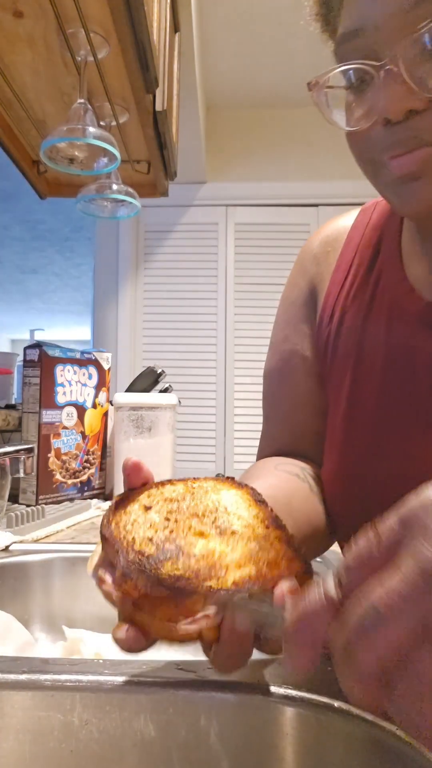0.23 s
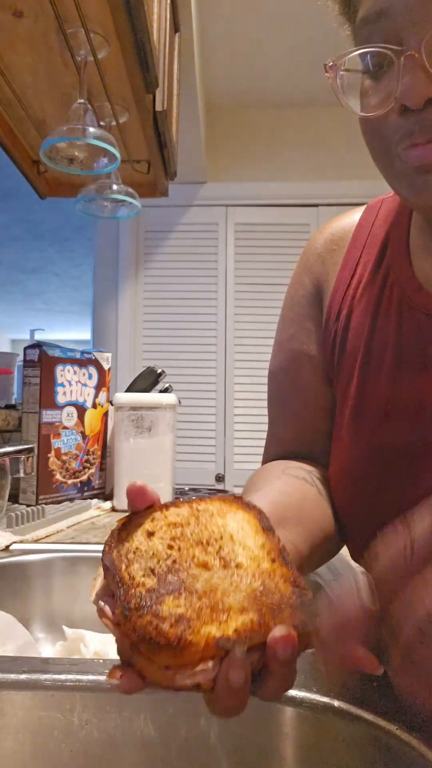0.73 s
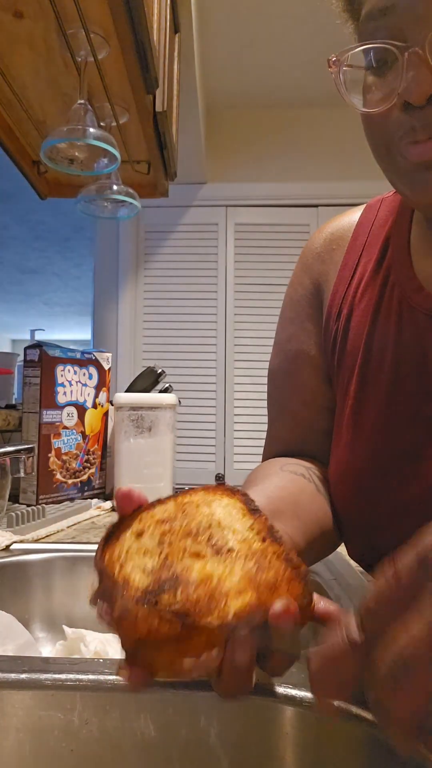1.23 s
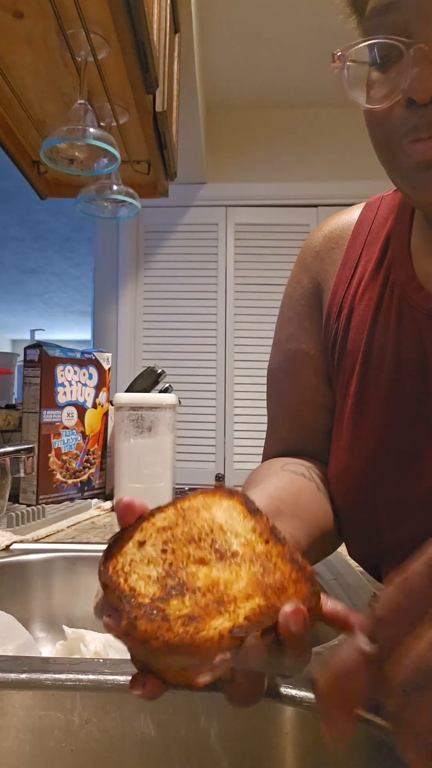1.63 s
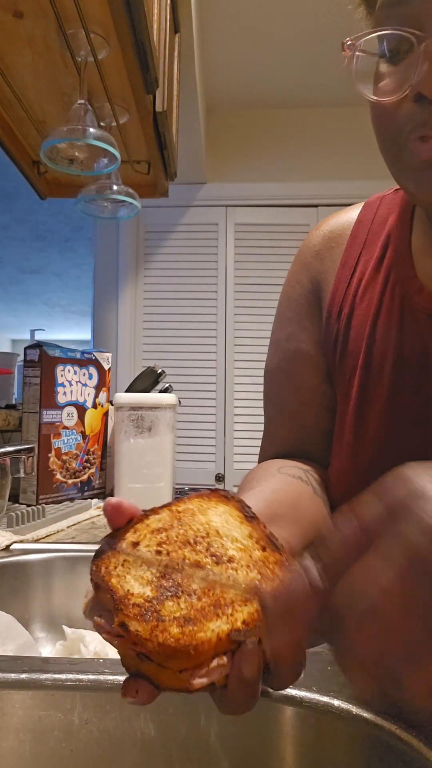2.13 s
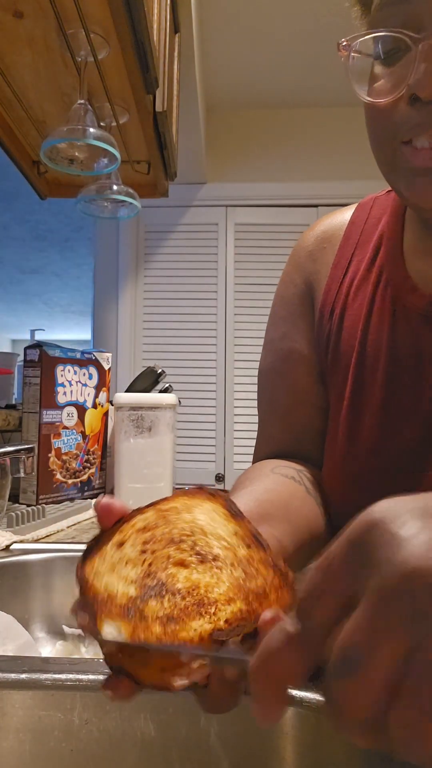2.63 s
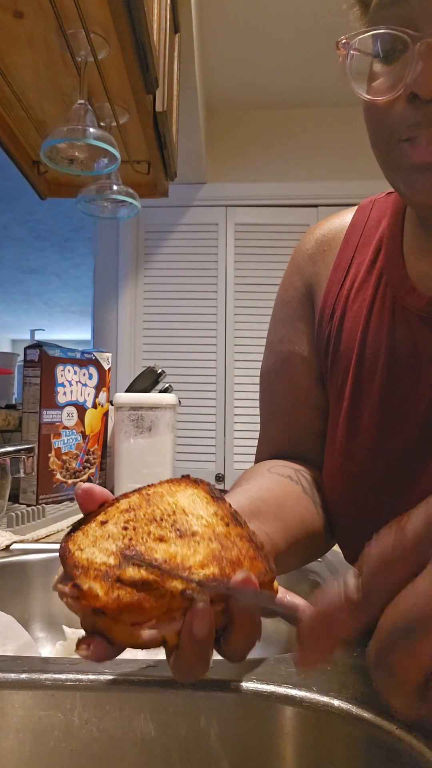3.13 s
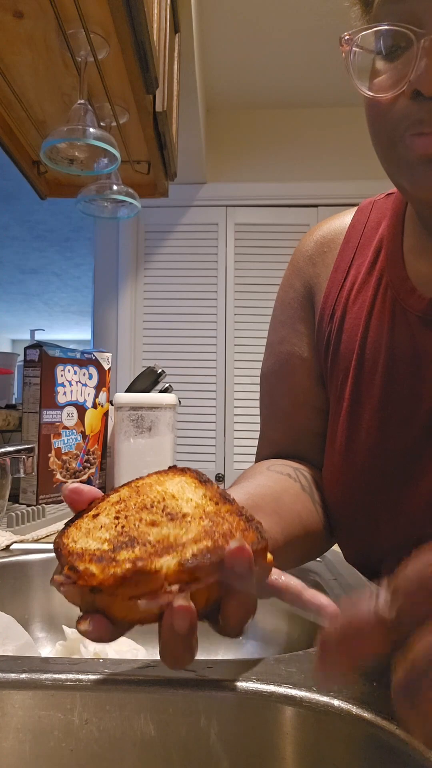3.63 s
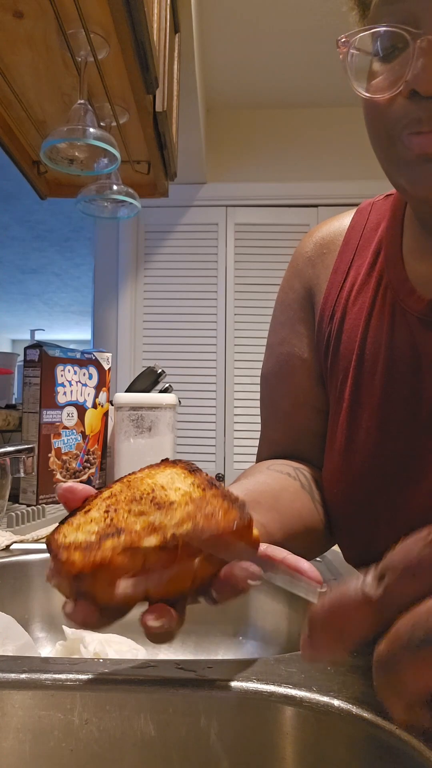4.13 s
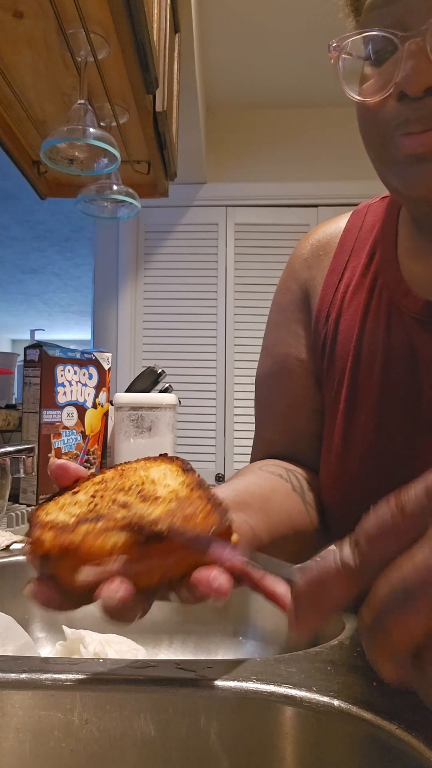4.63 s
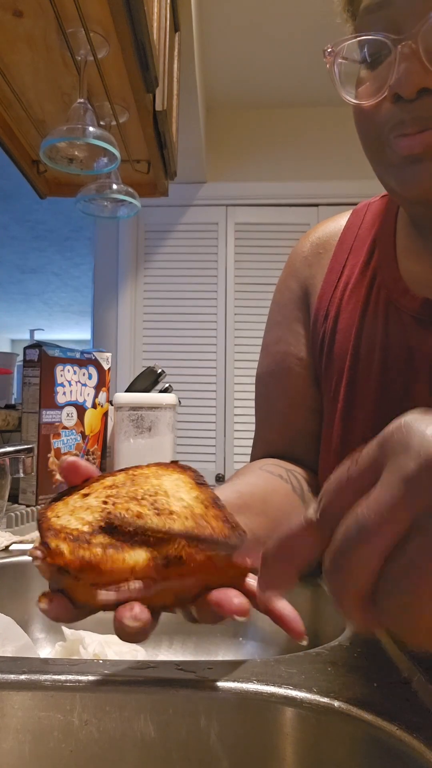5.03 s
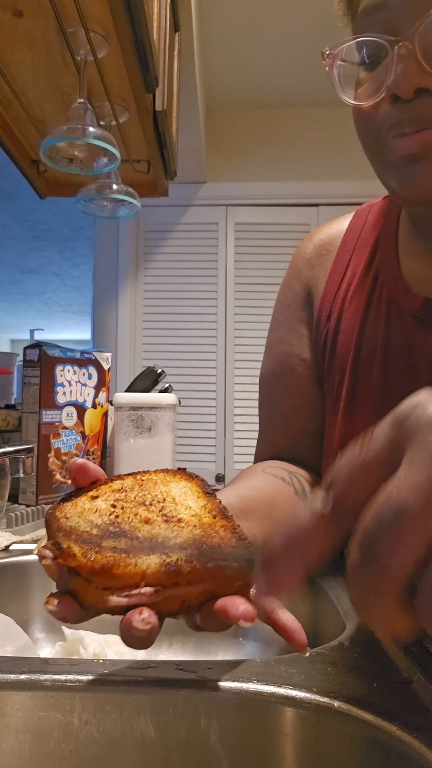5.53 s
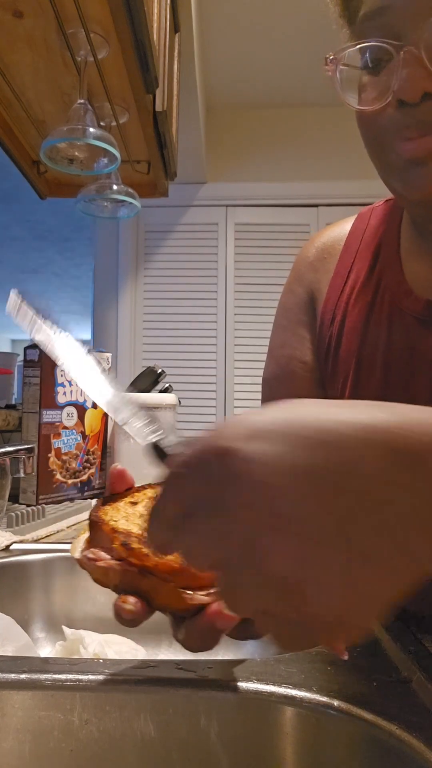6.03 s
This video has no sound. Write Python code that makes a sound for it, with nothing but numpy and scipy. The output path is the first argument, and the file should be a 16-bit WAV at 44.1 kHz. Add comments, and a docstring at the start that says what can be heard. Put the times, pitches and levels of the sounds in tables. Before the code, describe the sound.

Quick, regular dry scrapes of a metal blade on crunchy toasted crust, close up in a small humming kitchen, stopping just before the end.

```python
"""In a small kitchen, a knife scrapes the burnt crust off toast over a steel sink, five strokes a second.
In each stroke the blade lands with a tick, skims lightly, bites into a dense crackle and lifts off.
The crackle is random clicks smeared by nearby bounces and rung through the modes of the blade.
The largest flakes snap out above it. Filtered noise reverberates the scraping and supplies the air;
sines make an appliance hum and a last faint ring of steel."""
import sys
import numpy as np
from scipy import signal
from scipy.fft import rfft, irfft
from scipy.io import wavfile
from scipy.ndimage import uniform_filter1d

SR = 44100
rng = np.random.default_rng(int(sys.argv[2]) if len(sys.argv) > 2 else 0)


def digitize_waveform(pressure):
    """Quantize a signal to 16-bit integers and store it at the path in sys.argv[1].

    Rows of a 2-D input are taken as channels; values are limited to [-1, 1].
    """
    field = np.atleast_2d(pressure).T
    bounded = np.clip(field, -1, 1)
    quanta = np.round(bounded * 32767).astype(np.int16)
    wavfile.write(sys.argv[1], SR, quanta)


N = 276639

# knife strokes, levels relative: (lands_s, skim_duration_s, scrape_duration_s, tick_db, skim_db, force_db)
KNIFE_STROKES = [(0.0777, .022, 0.024, -37, -51.5, -35.5), (0.129, .006, 0.017, -43.5, -51, -32.5),
                 (0.289, 0.017, 0.053, -36.5, -46, -27.5), (0.4978, 0.021, 0.056, -32, -44, -30),
                 (0.7076, 0.011, 0.06, -29, -49, -26), (0.8897, .032, 0.063, -37.5, -49, -29),
                 (1.1039, 0.013, 0.065, -30.5, -45, -28), (1.285, .026, 0.052, -43, -48, -28.5),
                 (1.4779, 0.02, .057, -38.5, -55, -30), (1.6645, 0.024, .054, -36, -51, -28.5),
                 (1.8695, 0.018, 0.056, -34, -45.5, -26), (2.0743, 0.023, 0.052, -26, -40, -27.5),
                 (2.283, 0.015, 0.042, -35, -46, -28), (2.4656, 0.03, 0.041, -39.5, -54, -27),
                 (2.658, 0.016, 0.051, -30.5, -51, -30.5), (2.837, 0.027, 0.065, -35.5, -47, -32.5),
                 (3.054, 0.02, 0.051, -38, -54, -33.5), (3.244, 0.015, 0.06, -33.5, -45.5, -34.5),
                 (3.4377, 0.029, 0.044, -34, -51, -34.5), (3.6492, .024, 0.03, -39.5, -57.5, -38),
                 (3.8072, 0.04, 0.049, -47.5, -62, -30.5), (4.138, 0.045, .032, -31.5, -52.5, -28.5),
                 (4.3248, .031, 0.054, -34, -59, -31), (4.515, 0.033, 0.059, -30.5, -48.5, -32),
                 (4.7086, .036, 0.054, -37, -59, -35.5), (4.8922, 0.024, 0.063, -38, -57.5, -39),
                 (5.1338, 0.0043, 0.058, -30.5, -44.5, -34.5), (5.3313, 0.018, 0.044, -32, -43.5, -35.5),
                 (5.5161, 0.016, 0.058, -31.5, -48, -36.5)]
CUTOFF_HZ = 15900
TIME = np.arange(N) / SR
HZ = np.maximum(np.fft.rfftfreq(N, 1 / SR), 1)
USUAL_FORCE_DB = -31.5  # scrape force at which the tone is neutral
LEAD_S = 0.009  # lead-in: the crackle fades up this long before the landing


def from_db(db):
    """Decibels to gain."""
    return 10 ** (np.asarray(db) / 20)


def rms_one(x):
    """Scale to an rms of 1."""
    return x / np.sqrt(np.mean(x ** 2) + 1e-20)


def filter_hz(size):
    """Frequencies of a short filter in Hz, kept above zero for the log axis."""
    return np.maximum(np.fft.rfftfreq(size, 1 / SR), 1)


def at_hz(points, hz, channels=1):
    """Read a column of a table on a log-frequency axis."""
    points = np.array(points)
    return np.interp(np.log(hz), np.log(points[:, 0]), points[:, channels])


def causal(gain_db):
    """Minimum-phase response with these gains: it rings after a click, never before."""
    cepstrum = np.fft.irfft(np.log(from_db(gain_db)))
    half = cepstrum.shape[-1] // 2
    # fold the backward half of the cepstrum onto the forward half
    cepstrum[..., 1:half] *= 2
    cepstrum[..., half + 1:] = 0
    return irfft(np.exp(rfft(cepstrum)))


def add(out, s, sound):
    """Mix a stereo sound in at time s."""
    start = max(round(s * SR), 0)
    out[:, start:start + sound.shape[1]] += sound[:, :N - start]


def panned(sound, pan_db):
    """Tip a stereo sound to the left (positive) or right."""
    return sound * from_db([[pan_db / 2], [-pan_db / 2]])


def air(spectrum):
    """Steady stereo noise with this spectrum, alike on both sides in the bass; rms 1."""
    # left-right likeness of the air noise: (pitch_hz, likeness_0_to_1)
    air_likeness = [(100, 0.97), (250, 0.96), (500, 0.74), (1000, 0.22), (3000, 0.2)]
    mid, side = rfft(rng.standard_normal((2, N)))
    alike = np.clip(at_hz(air_likeness, HZ), 0, 1)
    both = np.sqrt(1 + alike) * mid + np.sqrt(1 - alike) * side * [[1], [-1]]
    return rms_one(irfft(both * from_db(at_hz(spectrum, HZ)), N))


def kitchen_air(rumble_rms_db=-55.0, hiss_rms_db=-73.0):
    """The still air of the kitchen: a strong low rumble under a faint hiss."""
    # spectra of the rumble and of the hiss, levels relative: (pitch_hz, density_db_per_hz)
    rumble_spectrum = [(12, -52.5), (20, -28), (39, -10), (65, -3), (90, -7.5), (150, -4), (199, -14),
                       (231, -10), (302, -16), (340, -9.5), (376, -21), (445, -18.5), (665, -20),
                       (870, -19.5), (1100, -66), (1430, -75), (2420, -120)]
    hiss_spectrum = [(530, -31), (900, -14), (991, -17), (1360, -15.5), (1660, -25), (2020, -22),
                     (2470, -29.5), (4980, -26.5), (5220, -35.5), (5960, -34.5), (16000, -50.5)]
    rumble = from_db(rumble_rms_db) * air(rumble_spectrum)
    hiss = from_db(hiss_rms_db) * air(hiss_spectrum)
    return rumble + hiss


def hum(level_db=-0.5, wander_rad=0.26, count=30):
    """Mains and motor lines of an appliance: sines whose phases wander slightly."""
    # lines of the hum, rms levels before the trim level_db: (pitch_hz, level_db)
    hum_lines = [(59.2, -62), (118.3, -58.5), (140.6, -59), (240.5, -69.5), (349, -79), (585, -72.5)]
    out = np.zeros(N)
    knots = np.linspace(0, TIME[-1], count)
    for hz, line_db in hum_lines:
        sway = np.interp(TIME, knots, rng.standard_normal(count))
        phase = 2 * np.pi * (hz * TIME + rng.random()) + wander_rad * sway
        out += np.sqrt(2) * from_db(line_db + level_db) * np.sin(phase)
    return out


def free_blade(swell_s=0.048):
    """A thin steel tone swells and fades once the blade is clear of the bread."""
    # the freed blade sings faintly as the knife is raised: (start_s, pitch_hz, level_db, t60_s)
    free_ring = (5.95, 5370, -77, 0.7)
    start_s, hz, level_db, t60_s = free_ring
    t = np.maximum(TIME - start_s, 0)
    envelope = (1 - np.exp(-t / swell_s)) * np.exp(-np.log(1000) * t / t60_s)
    return from_db(level_db) * envelope * np.sin(2 * np.pi * hz * t)


def kitchen(x, build_s=0.0052, size=22050):
    """Diffuse reverberation: noise, different on each side, each band dying at its own rate."""
    # reverberation time of the kitchen: (pitch_hz, t60_s)
    room_t60 = [(300, 0.19), (1500, 0.51), (4500, 0.27), (8000, 0.42), (15000, 0.22)]
    t = np.arange(size) / SR
    edges = np.geomspace(200, 17000, num=9)
    tail = 0
    for low, high in zip(edges, edges[1:]):
        band_pass = signal.butter(2, [low, high], "band", fs=SR, output="sos")
        band = signal.sosfilt(band_pass, rng.standard_normal((2, size)))
        t60_s = at_hz(room_t60, np.sqrt(low * high))
        tail = tail + band * from_db(-60 * t / t60_s)
    tail = tail * (1 - np.exp(-t / build_s))
    tail = tail / np.linalg.norm(tail, axis=1, keepdims=True)
    return signal.fftconvolve(x, tail, axes=1)[:, :N]


def coloured(x, low_cut_hz=260, size=4096):
    """Give the crunch its broad colour and its fixed resonances and notches."""
    # broad colour at the two microphones, levels relative: (pitch_hz, left_db, right_db)
    crunch_colour = [(198, -8.5, -12), (540, -21, -18), (990, -21, -12.5), (1940, -18, -13.5),
                     (3540, -11, -9), (4084, -7, -1.5), (5480, -12, -7.5), (7540, -17, -22),
                     (9240, -12, -17.5), (11360, -20.5, -30), (12460, -14, -23.5), (14200, -18.5, -40),
                     (15260, -12.5, -20)]
    # fixed resonances and notches at the two microphones, added to the colour; a bell falls to 1/e at its
    # reach: # (centre_hz, reach_hz, left_db, right_db)
    fixed_resonances = [(663, 62, -8.5, 2.5), (864, 110, -1, -10.5), (1062, 60, 10, 2),
                        (1417, 170, 0, -3.5), (2975, 170, 1, 2.5), (3635, 180, 4.5, 3.5),
                        (4534, 204, 8.5, 10.5), (4886, 38, 1.5, 7), (5910, 180, 7, 1.5),
                        (6755, 120, -9.5, -19.5), (9660, 430, -12.5, -33)]
    hz = filter_hz(size)
    gain_db = np.array([at_hz(crunch_colour, hz, channels=1), at_hz(crunch_colour, hz, channels=2)])
    for centre, width, left, right in fixed_resonances:
        gain_db += np.outer([left, right], np.exp(-((hz - centre) / width) ** 2))
    # overall power gain near 1
    gain_db -= 10 * np.log10(np.mean(from_db(gain_db) ** 2 * (hz < CUTOFF_HZ)))
    x = signal.fftconvolve(x, causal(gain_db), axes=1)[:, :N]
    return signal.sosfilt(signal.butter(2, low_cut_hz, "high", fs=SR, output="sos"), x)


def off_centre(x, left_lag_s=0.00004):
    """The toast is a little nearer the right microphone, so the left one hears it later."""
    return irfft(rfft(x) * np.exp(-2j * np.pi * HZ * [[left_lag_s], [0]]), N)


def grip_at(s):
    """Lean and the two ring levels at time s, as the hand's hold on the knife drifts."""
    # hold on the knife; lean is the extra force at a stroke's end over its start:
    # (time_s, lean_db, lower_ring_db, upper_ring_db)
    grip_path = [(0.1, -4, -6.5, 0.5), (0.33, 0.5, -4, -0.5), (0.7, 4.5, 0, 1), (1.55, 3.5, 0.5, 2.5),
                 (1.9, 1.5, -1.5, 7), (2.15, -6.5, 2, 0.5), (2.5, 6.5, 0.5, -4), (2.9, 9.5, 1, 2.5),
                 (3.4, 10, 2, 3), (3.75, -6, 1, 0), (4.25, -2, -1, -3), (4.8, -8.5, 0.5, -0.5),
                 (5.14, 4.5, 4, 7), (5.54, 2, -3, 8)]
    grip_s, *columns = np.transpose(grip_path)
    return [np.interp(s, grip_s, column) for column in columns]


def timbre(s, force_db, size=1024):
    """Force tilts the tone; the grip decides how freely each of the blade's two main rings sounds."""
    # tone of the crunch; the shares multiply the grip's ring levels:
    # (pitch_hz, usual_force_db, db_per_db_of_force, lower_ring_share, upper_ring_share)
    crunch_tone = [(2410, 0, -.3, -0.15, -0.053), (3130, -1.5, -0.07, -0.12, -0.16),
                   (4150, 0.1, 0, 0.29, -0.45), (4380, 1, 0.15, 1, -0.39), (4550, -0.5, 0.22, 1, 0.15),
                   (4740, 2, 0.2, 0.5, 1), (4630, -2.5, 0.4, -0.73, 1), (5530, 0.72, -0.05, -0.18, -0.37)]
    _, lower_db, upper_db = grip_at(s)
    extra_force_db = force_db - USUAL_FORCE_DB
    tone = []
    for hz, usual_db, by_force, lower, upper in crunch_tone:
        tone.append((hz, usual_db + by_force * extra_force_db + lower * lower_db + upper * upper_db))
    return causal(at_hz(tone, filter_hz(size)))[None]


def blade(sound, detune=0.0079, uneven_db=2.0, size=4000):
    """Each contact rings the steel's decaying modes; grip and contact point shift them slightly."""
    # narrow rings damped by hand and bread, nominal, relative to the plain crunch:
    # (pitch_hz, level_db, t60_s)
    blade_modes = [(646, -0.5, 0.24), (1450, 9.5, 0.07), (1890, -6, 0.13), (2230, 6, 0.23), (2860, 1, 0.12),
                   (4090, -23, 0.061), (4380, -19.5, .06), (4820, -5.5, 0.052), (6240, -16.5, 0.039)]
    t = np.arange(size) / SR
    response = np.zeros(size)
    response[0] = 1  # the plain crunch
    for hz, mode_db, t60_s in blade_modes:
        shift, strength = rng.standard_normal(2)
        rate = np.log(1000) / t60_s
        gain = 2 * rate / SR * from_db(mode_db + uneven_db * strength)
        mode_hz = hz * (1 + detune * shift)
        response += gain * np.exp(-rate * t) * np.cos(2 * np.pi * mode_hz * t)
    return signal.fftconvolve(sound, response[None], axes=1)


def gripped(sound, s, force_db):
    """Pass a contact at time s through the hand-held blade."""
    return blade(signal.fftconvolve(sound, timbre(s, force_db), axes=1))


def scatter(clicks, near_s=0.00058, sink_s=0.0078, sink_db=-4.5, size=1024):
    """Bounces off blade, hands and sink smear clicks into stereo, drawn anew for each contact."""
    # left-right likeness of the direct crunch: (pitch_hz, likeness_0_to_1)
    crunch_likeness = [(500, 0.98), (1500, 0.4), (4500, 0.65), (6200, 0.89), (8000, 0.16), (15000, 0.1)]
    t = np.arange(size) / SR
    near = rng.standard_normal((2, size)) * np.exp(-t / near_s)
    sparse = rng.random((2, size)) < 0.05
    sink = rng.standard_normal((2, size)) * sparse * np.exp(-t / sink_s)
    near_paths = rfft(near) / np.linalg.norm(near, axis=1, keepdims=True)
    sink_paths = rfft(sink) / np.linalg.norm(sink, axis=1, keepdims=True)
    alike = np.clip(at_hz(crunch_likeness, filter_hz(size)), 0, 1)
    paths = np.sqrt(alike) + np.sqrt(1 - alike) * near_paths + from_db(sink_db) * sink_paths
    # the bounces comb the spectrum finely but leave its broad shape alone
    paths /= np.sqrt(uniform_filter1d(np.abs(paths) ** 2, size=13, axis=1))
    return signal.fftconvolve(clicks[None], irfft(paths)[:, :size * 3 // 4], axes=1)


def crumbs(t, per_s, spread_db, size_limit=2.39):
    """Crumbs break at random moments, many small and a few large; rms 1."""
    sizes = from_db(spread_db * np.minimum(rng.exponential(1, len(t)), size_limit))
    signs = rng.choice([-1, 1], len(t))
    breaks = rng.random(len(t)) < per_s / SR
    return rms_one(sizes * signs * breaks)


def crack(decay_s, trail_db, rise_s=0.0008, size=800):
    """A break: crumbs build up and die away around one sharp click; energy 1 before scattering."""
    t = np.arange(size) / SR
    envelope = (1 - np.exp(-t / rise_s)) * np.exp(-t / decay_s)
    trail = crumbs(t, per_s=9000, spread_db=1.5) * envelope
    burst = from_db(trail_db) * trail / np.linalg.norm(trail)
    burst[min(round(rise_s * SR), size - 1)] += 1
    return scatter(burst / np.linalg.norm(burst))


def ticks(touch_db=16.0, pan_db=0.4, knock_db=4.0, knock_per_db=-0.1, knock_hz=2200, size=256):
    """The blade ticks as it lands and at stray touches; softer touches have less low knock."""
    # stray touches of the blade, between strokes or during a skim, levels before touch_db:
    # (start_s, level_db)
    stray_touches = [(0.053, -32), (2.612, -42.5), (3.454, -45), (4.16, -38), (4.7305, -35), (5.793, -56.5),
                     (5.8243, -47.5), (5.9194, -57)]
    out = np.zeros((2, N))
    hz = filter_hz(size)
    touches = [(lands_s, tick_db) for lands_s, _, _, tick_db, _, _ in KNIFE_STROKES]
    touches += [(start_s, level_db) for start_s, level_db in stray_touches]
    usual_db = np.median([level_db for _, level_db in touches])
    for s, level_db in touches:
        knock = np.clip(knock_db + knock_per_db * (usual_db - level_db), -6, 8)
        tone = causal(at_hz([(knock_hz, knock), (2 * knock_hz, 0)], hz))
        tick = signal.fftconvolve(crack(decay_s=0.0034, trail_db=5.5), tone[None], axes=1)
        tick = gripped(panned(tick, pan_db), s, USUAL_FORCE_DB)
        add(out, s, tick * from_db(level_db + touch_db))
    return out


def flakes(snap_db=12.0, size=256):
    """A flake gives way and flicks the blade, mostly around its main rings."""
    # the largest flakes of crust snap off, levels before snap_db: (start_s, level_db)
    crust_snaps = [(0.5404, -11), (0.569, -17.5), (0.7483, -14), (0.9537, -21), (0.958, -13), (1.3124, -21),
                   (1.498, -26), (1.5451, -15.5), (1.924, -11.5), (2.5173, -13), (2.9024, -21),
                   (3.261, -21.5), (3.3143, -18), (3.48, -18.5), (3.89, -19.5), (4.37, -14), (5.3687, -26),
                   (5.5493, -16), (5.578, -20)]
    out = np.zeros((2, N))
    flick = causal(at_hz([(2000, -5), (4600, 3), (7000, -6)], filter_hz(size)))
    for s, level_db in crust_snaps:
        snap = signal.fftconvolve(crack(decay_s=0.002, trail_db=10.5), flick[None], axes=1)
        add(out, s, gripped(snap, s, USUAL_FORCE_DB) * from_db(level_db + snap_db))
    return out


def crackle(t, judder_db=1.0, judder_s=0.0044, size=900):
    """The edge catches and slips, so crumbs break in clumps, while the hand keeps the mean force steady."""
    catches = np.arange(t[0], t[-1], judder_s)
    judder = from_db(judder_db * np.interp(t, catches, rng.standard_normal(len(catches))))
    clicks = crumbs(t, per_s=4500, spread_db=4.0) * judder
    # divide by the running rms
    return clicks / np.sqrt(np.abs(uniform_filter1d(clicks ** 2, size=size)) + 1e-9)


def pressure(t, skim_s, scrape_s, skim_db, force_db, lean_db, lead_db=-17.0, bite_s=0.0035,
             start_db=-4.0, crest_db=1.0, end_db=-4.5, ease_s=0.0036,
             lift_s=0.0067, lifted_db=-17.5, loose_db_per_s=-380.0):
    """Level in dB, t seconds after landing: the blade skims, bites, presses in mid-stroke and lifts."""
    lift = skim_s + scrape_s
    skim = [(-LEAD_S, lead_db), (0, -2), (max(skim_s - bite_s, 0), 0)]
    scrape = [(skim_s, start_db - lean_db / 2),
              (skim_s + scrape_s / 2, crest_db),
              (lift - ease_s, end_db + lean_db / 2),
              (lift + lift_s, lifted_db + lean_db / 2)]
    shape = [(s, skim_db + db) for s, db in skim] + [(s, force_db + db) for s, db in scrape]
    loose_db = loose_db_per_s * np.maximum(t - lift - lift_s, 0)
    return np.interp(t, *np.transpose(shape)) + loose_db


def strokes(level_db=-0.24, loose_s=0.05):
    """Each stroke crackles under the pressure of the blade; a few loose crumbs trail after it."""
    out = np.zeros((2, N))
    for lands_s, skim_s, scrape_s, _, skim_db, force_db in KNIFE_STROKES:
        bites_s = lands_s + skim_s
        lean_db, _, _ = grip_at(bites_s)
        t = np.arange(-LEAD_S, skim_s + scrape_s + loose_s, 1 / SR)
        press_db = pressure(t, skim_s, scrape_s, skim_db, force_db, lean_db)
        scrape = crackle(t) * from_db(press_db + level_db)
        add(out, lands_s - LEAD_S, gripped(scatter(scrape), bites_s, force_db))
    return out


def scene(room_db=-20.5):
    """Scraping and its reverberation over the kitchen's background."""
    background = kitchen_air() + hum()
    scraping = ticks() + flakes() + strokes()
    in_room = scraping + from_db(room_db) * kitchen(scraping)
    return off_centre(coloured(in_room)) + free_blade() + background


def record(dry):
    """The top is cut steeply."""
    top_cut = signal.ellip(10, 0.2, 80, CUTOFF_HZ - 400, fs=SR, output="sos")
    return signal.sosfilt(top_cut, dry)


dry = scene()
out = record(dry)
digitize_waveform(out)
```